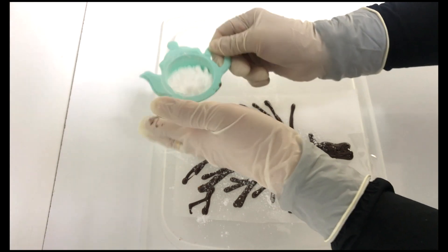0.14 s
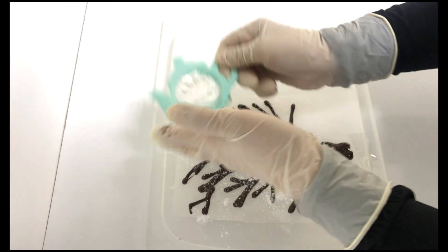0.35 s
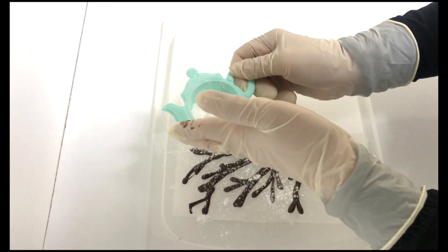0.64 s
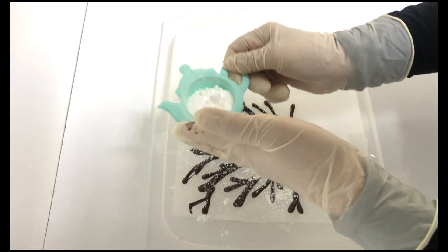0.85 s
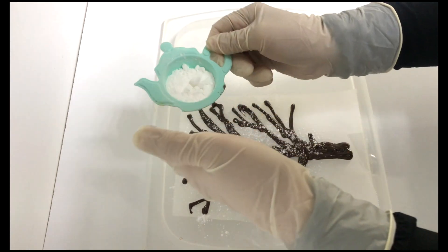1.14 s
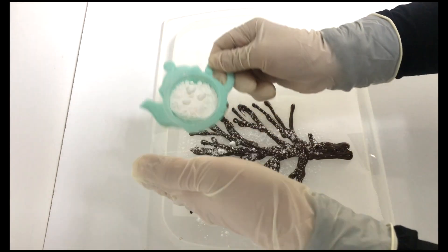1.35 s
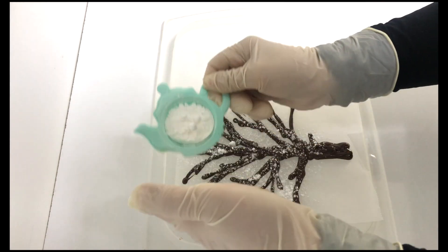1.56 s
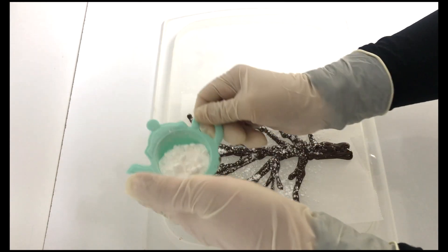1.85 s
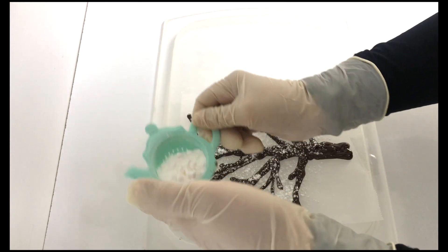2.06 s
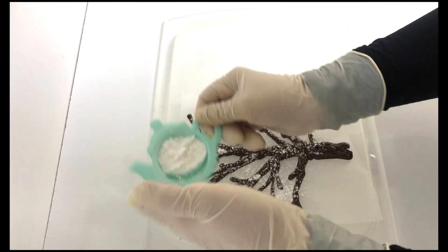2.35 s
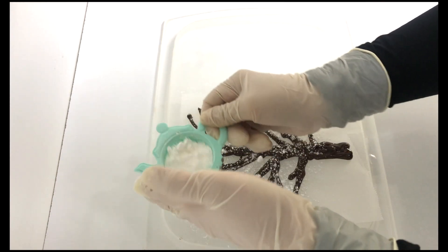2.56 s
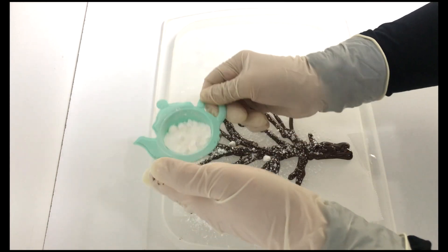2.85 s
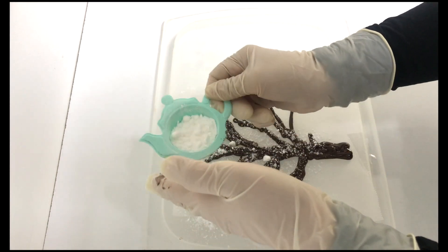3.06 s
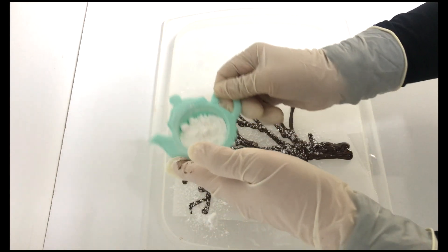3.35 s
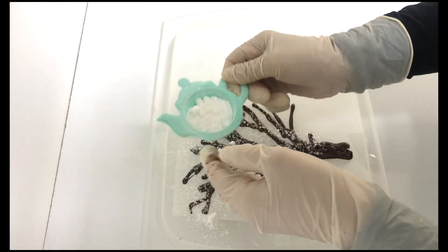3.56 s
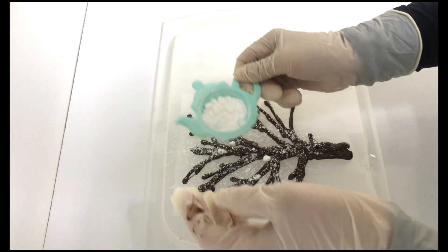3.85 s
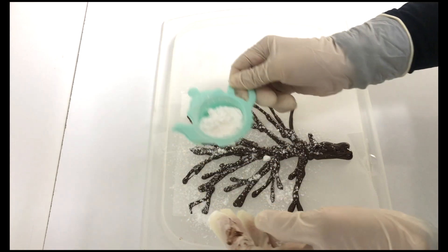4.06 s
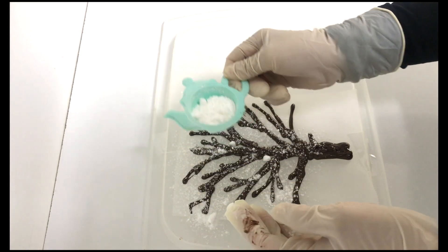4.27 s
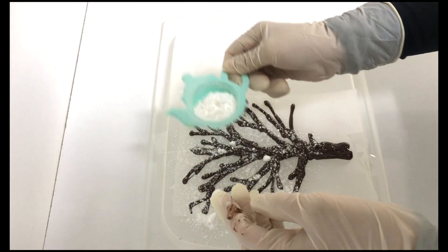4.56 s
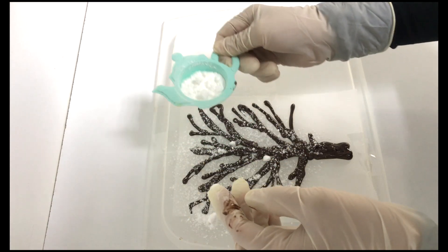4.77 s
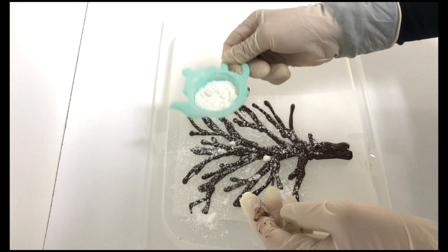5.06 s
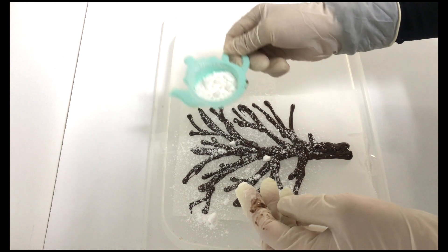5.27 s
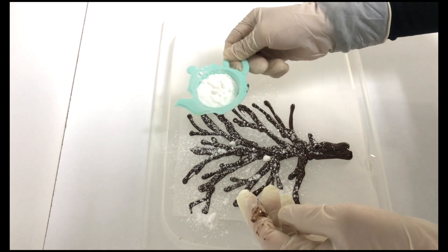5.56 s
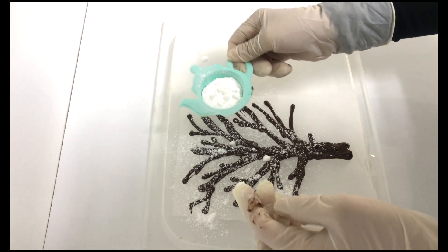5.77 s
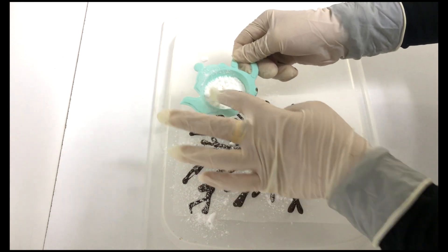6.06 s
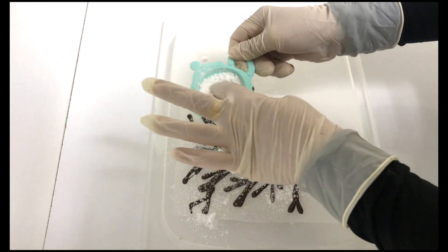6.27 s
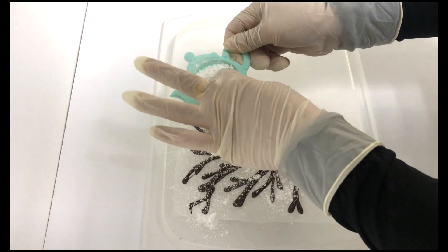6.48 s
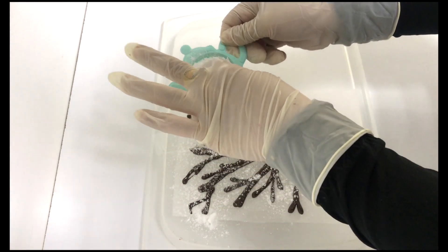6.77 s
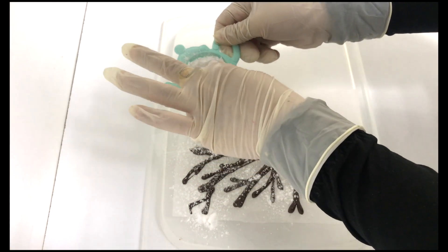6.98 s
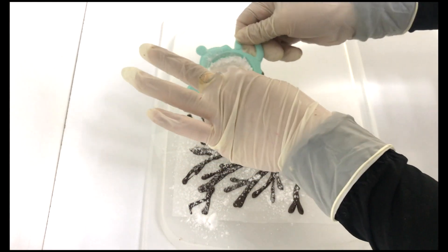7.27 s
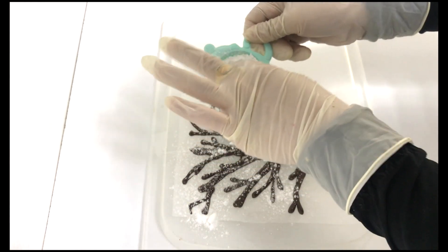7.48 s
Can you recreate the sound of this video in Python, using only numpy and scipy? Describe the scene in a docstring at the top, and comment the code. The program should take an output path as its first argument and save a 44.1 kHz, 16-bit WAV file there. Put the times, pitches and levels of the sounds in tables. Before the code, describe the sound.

A plastic sieve of powdered sugar is tapped and shaken, with quick grainy hisses, light ticks and two hollow knocks.

```python
"""Sifting powdered sugar

A small plastic sieve is tapped against a gloved hand and shaken over a plastic tub. Each stroke slides
sugar over the mesh in a grainy hiss while lumps tick on the wall, both coloured by the sieve's cup.
The tub takes two hollow knocks, and the rubber glove rubs the rim, mostly near the end.
Underneath, an appliance hums in the small kitchen."""
import sys
import numpy as np
from scipy import signal
from scipy.fft import rfft, irfft
from scipy.io import wavfile

SR = 44100
rng = np.random.default_rng(int(sys.argv[2]) if len(sys.argv) > 2 else 0)


def wav_out(sig):
    """Save sig, one row per channel (or a flat mono array), as 16-bit PCM at SR to the path in sys.argv[1]."""
    wavfile.write(sys.argv[1], SR, np.round(np.clip(np.atleast_2d(sig).T, -1, 1) * 32767).astype(np.int16))


N = 336483
TIME = np.arange(N) / SR

# The appliance's rush of air. Each row: frequency in Hz, relative level in dB.
AIR_COLOUR = [(15, -60), (25, -18.5), (53, -8.5), (175, 1), (463, -6.5), (531, -4.5), (863, -14.5),
              (1650, -20), (2110, -19.5), (3080, -18.5), (4250, -23), (5140, -22), (7510, -26.5),
              (11600, -33), (16000, -37)]
# Its motor tones. Each row: frequency in Hz, rms level in dB, depth of waver in dB.
MOTOR_TONES = [(80.8, -69.5, 3), (122.5, -75, 3.5), (157.8, -63, 1.5), (199.5, -61.5, 4.5), (243, -65, 2),
               (322.7, -69, 5.5), (520.3, -63, 0.5)]
# The kitchen's reverb. Each row: frequency in Hz, seconds to fall 60 dB.
ROOM_DECAY = [(150, 0.78), (600, 0.56), (2000, 0.39), (5000, 0.19), (14000, 0.15)]
# A faint swell, then the glove on the rim. Each row: crest in seconds, level in dB, half length in seconds, #
# squeak in Hz. The first row, near 4.1 s, is a faint hoarse swell; the rest are the glove rubbing the rim.
RUBS_AND_SWELL = [(4.102, -59, 0.36, 2500), (6.301, -54.5, 0.23, 3900), (6.62, -59.5, 0.1, 4900),
                  (6.961, -55, 0.092, 5400), (7.198, -61, 0.05, 4200), (7.62, -60, .06, 4800)]
# The tone of slipping rubber. Each row: frequency in Hz, relative level in dB.
RUBBER_COLOUR = [(800, -36), (1600, -2), (2900, -1), (3550, -1), (3850, 1.5), (4250, 2), (4800, -1.5),
                 (5600, -4), (6600, -5), (8000, -14), (11000, -19), (16000, -25)]
# Blows and skids that make up the two knocks. Each row: start in seconds, level in dB,
# high cut in Hz, low cut in Hz, contact time in seconds, ring in the blend in dB.
TUB_BLOWS = [(2.4951, -22, 1970, 790, 0.002, -5), (2.4972, -13, 1270, 363, 0.01, -3.5),
             (2.5592, -23, 1920, 320, 0.035, 0), (2.592, -36, 1400, 480, 0.02, -2),
             (5.597, -36.5, 900, 400, 0.013, -16), (5.607, -23, 1390, 403, 0.034, -3.5),
             (5.634, -27, 1520, 200, 0.01, -8), (5.647, -26, 1850, 141, .017, -17),
             (5.673, -30.5, 480, 220, 0.011, -17), (5.741, -40, 420, 201, 0.0036, -24),
             (5.813, -39.5, 850, 160, 0.031, -25)]
# The tub's hollow ring. Each row: frequency in Hz, relative level in dB, seconds to fall 60 dB.
TUB_MODES = [(172, -17, .2), (326, -6, .25), (341.5, -8, .25), (370, -15, .18), (510, -11, .24),
             (545, -11, .22), (574.5, 2, .33), (591, -7, .3), (607, -8, .28), (640, -8, .32),
             (761, -10, .28), (894, -7, .2), (1088, -11, .15), (1255, -7, .16), (1458, -3, .19),
             (1617, -9, .16), (1741, -9, .16), (2066, -10, .15), (2440, -8, .12), (2590, -12, .1),
             (3180, -14, .1), (4170, -18, .08)]
# The tub's attack. Each row: frequency in Hz, relative level in dB.
CRACK_COLOUR = [(100, 5.5), (170, 1.5), (250, -3.5), (340, 3.5), (560, 0.5), (850, -2), (1050, -7),
                (1450, -1), (2100, -4), (3200, -0.5), (4600, -2.5), (5600, -1), (10000, 4)]
# The held sieve's ring. Each row: frequency in Hz, relative level in dB, seconds to fall 60 dB.
SIEVE_MODES = [(894, 0.5, 0.066), (1468, -8, 0.12), (1660, -2.5, 0.044), (2330, -6, 0.036),
               (2830, -3, 0.073)]
# Broad resonances of the sieve's cup. Each row: centre in Hz, width in Hz, lift in dB.
CUP_RESONANCES = [(4357, 150, 5), (5300, 540, -1), (6030, 170, 3), (7150, 120, 6), (8620, 920, 5.5),
                  (11060, 490, 4.5), (13050, 1200, 2.5)]
# The hand shades the cup and lowers its lowest resonance. Each row: time in seconds, low edge in Hz.
GRIP_EDGE = [(0.2, 3400), (0.8, 3820), (1.35, 4140), (1.7, 3500), (3.05, 3240), (3.9, 4030), (5.45, 3850),
             (5.65, 3280), (6.6, 3220), (7.0, 2720), (7.6, 3630)]
# The rim meets the hand and the sugar runs on. Each row: start in seconds, sugar level in dB,
# gain of the sieve's ring and slap in dB.
HAND_TAPS = [(0.111, -36, -52.5), (.296, -35, -56), (0.491, -37, -55), (.696, -33.5, -61),
             (.883, -37.5, -53), (1.307, -37.5, -57), (1.527, -36.5, -56), (1.732, -39.5, -54),
             (1.905, -38, -54), (2.097, -37.5, -48), (2.298, -35.5, -46.5), (2.883, -46, -58),
             (3.035, -38, -56.5), (3.237, -42.5, -57)]
# Big lumps and fingers on the plastic. Each row: start in seconds, level in dB, brightness in dB.
WALL_TICKS = [(.1116, -31, -16), (.456, -34.5, -37), (.6505, -36, -2), (.682, -27.5, 4), (.8371, -39, 12),
              (.864, -26, -21), (1.0285, -37, 26), (1.093, -44, 19), (1.5061, -38.5, -38),
              (1.645, -29, -13), (1.9798, -32, 4), (2.045, -27.5, -7), (2.1858, -40, -18),
              (2.2502, -29.5, 7), (2.2851, -24.5, -16), (2.4462, -34, 6), (2.489, -28, -18),
              (2.6637, -32.5, -9), (2.7714, -44.5, -14), (2.9615, -36.5, 17), (2.9984, -34, -34),
              (3.1944, -27.5, 3), (3.24, -34, -2), (3.3419, -30.5, 4), (3.3984, -41, -20),
              (3.4993, -24.5, -36), (3.726, -41, 24), (4.0146, -33, 8), (4.154, -23, -14),
              (4.478, -29.5, -3), (4.5504, -34, -24), (4.809, -35, -35), (4.885, -31.5, -19),
              (5.169, -37, 21), (5.425, -26, 8), (5.616, -31, -13), (5.6477, -18, -18), (5.7121, -28.5, -5),
              (5.764, -23.5, 7), (5.8708, -35.5, -7), (5.9433, -35, 21), (6.4708, -36.5, -40),
              (6.9926, -18.5, -30), (7.096, -37, 18), (7.1652, -36, -28)]
# Swings throw the sugar back. Each row: crest in seconds, level in dB, half length in seconds,
# brightness in dB.
BACK_SWINGS = [(.064, -55.5, 0.02, -2), (.257, -46, 0.013, 7), (0.443, -47, 0.0093, -8),
               (0.658, -44, 0.012, 6), (0.857, -48, 0.019, -8), (0.968, -55, .009, -17),
               (1.449, -50, 0.019, 13), (1.648, -45.5, 0.016, 0), (1.849, -43, 0.016, -9),
               (1.984, -46, 0.0071, 11), (2.048, -45, 0.02, 4), (2.264, -42.5, 0.03, 1),
               (2.307, -38, 0.027, 1), (2.46, -54, 0.045, 1), (2.515, -46, 0.023, 11),
               (2.62, -42, 0.0085, 0), (2.682, -48, 0.028, -5), (2.936, -48, 0.0094, -1),
               (3.001, -51.5, 0.027, 0), (3.193, -46, 0.032, 4), (3.311, -50, .012, -17),
               (3.38, -40, 0.036, -9.5), (3.474, -52, 0.009, -13), (3.516, -52.5, .013, -13),
               (3.656, -51, 0.022, -36), (5.737, -44, 0.035, -1), (6.256, -49.5, 0.035, 0)]
# Shakes in the air, about twelve a second. Each row: crest in seconds, level in dB.
AIR_SHAKES = [(3.953, -53), (4.025, -62), (4.157, -45.5), (4.224, -43.5), (4.314, -52), (4.403, -44),
              (4.485, -46.5), (4.564, -43), (4.648, -47), (4.732, -45.5), (4.815, -48), (4.892, -53),
              (4.983, -48.5), (5.076, -60), (5.166, -44.5), (5.255, -52.5), (5.345, -47.5), (5.434, -49.5),
              (5.512, -48.5), (5.873, -54.5), (5.953, -49)]
# Strokes muffled under the palm. Each row: crest in seconds, level in dB, rise in seconds.
PALM_STROKES = [(6.35, -47.5, 0.022), (6.48, -37, 0.019), (6.713, -48.5, .019), (6.769, -41, 0.017),
                (7.01, -36.5, 0.023), (7.167, -43, 0.014), (7.473, -43, 0.05), (7.604, -49, .017)]


def undb(db):
    """Decibels to gain."""
    return 10 ** (np.asarray(db) / 20)


def unit(x):
    """Scale to rms 1."""
    return x / np.sqrt(np.mean(x ** 2))


def level_hit(x, db, span_s):
    """Give a hit the energy of a steady sound at db lasting span_s."""
    return undb(db) * x / np.sqrt(np.sum(x ** 2) / (span_s * SR))


def add(out, start_s, x):
    """Mix x into out at start_s."""
    offset = int(round(start_s * SR))
    first, end = max(offset, 0), min(offset + len(x), N)
    out[first:end] += x[first - offset:end - offset]


def freqs(size):
    """Bin frequencies in Hz for size samples, floored at 1."""
    return np.maximum(np.arange(size // 2 + 1) * SR / size, 1)


def over_hz(points, hz):
    """Read (Hz, value) points on a log-frequency axis."""
    point_hz, value = np.transpose(points)
    return np.interp(np.log(hz), np.log(point_hz), value)


def tint(x, points):
    """EQ x through (Hz, dB) points, then scale to rms 1."""
    return unit(irfft(rfft(x) * undb(over_hz(points, freqs(len(x)))), len(x)))


def butter(x, hz, kind, order=2):
    """Low-pass or high-pass filter."""
    return signal.sosfilt(signal.butter(order, min(hz, SR / 2 - 1), kind, fs=SR, output="sos"), x)


def walk(rate_hz):
    """Smooth random wander with a spread near 1."""
    knots = rng.standard_normal(int(N / SR * rate_hz) + 2)
    return np.interp(TIME * rate_hz, np.arange(len(knots)), knots)


def grains(n, per_s, spread_db):
    """A dense spray of tiny, uneven impacts."""
    hits = rng.random(n) < per_s / SR
    return hits * rng.standard_normal(n) * undb(spread_db * np.minimum(rng.exponential(size=n), 4))


def ring(modes, t):
    """Modes struck together, balanced a little differently at each point of contact."""
    hz, db, t60 = np.transpose(modes)[:, :, None]
    gains = undb(db + 2.05 * rng.standard_normal((len(modes), 1)))
    return np.sum(gains * np.sin(2 * np.pi * hz * t) * np.exp(-np.log(1000) * t / t60), axis=0)


def appliance(air_db=-55, drift_hz=1.655):
    """The bed: wavering motor tones over a steady rush of air."""
    out = tint(rng.standard_normal(N), AIR_COLOUR) * undb(air_db + .5 * walk(2.45))
    for hz, db, waver_db in MOTOR_TONES:
        phase = 2 * np.pi * np.cumsum(hz + drift_hz * walk(12)) / SR
        out += np.sqrt(2) * undb(db + waver_db * walk(5.4)) * np.sin(phase)
    return out


def kitchen(x, wet_db, predelay_s):
    """Hard walls add a diffuse tail whose treble dies first."""
    hz, t, spectrum = signal.stft(rng.standard_normal(SR // 2), SR)
    fade = np.exp(-np.log(1000) * t / over_hz(ROOM_DECAY, hz + 1)[:, None])
    tail = signal.istft(spectrum * fade, SR)[1]
    tail = np.pad(tail / np.sqrt(np.sum(tail ** 2)), (int(predelay_s * SR), 0))
    return x + undb(wet_db) * signal.fftconvolve(x, tail)[:len(x)]


def glove_and_swell(squeak_db=-3, hoarse_hz=250, wander_hz=250):
    """Rubber drags on plastic in tiny slips and squeaks hoarsely as it presses harder; the same slips and
    squeak also shape a faint hoarse swell near 4.1 s."""
    pressure = sum(undb(db) * np.exp(-((TIME - s) / half_s) ** 2) for s, db, half_s, _ in RUBS_AND_SWELL)
    slips = tint(grains(N, per_s=6000, spread_db=2), RUBBER_COLOUR)
    crests, _, _, squeak_hz = np.transpose(RUBS_AND_SWELL)
    pitch_hz = np.interp(TIME, crests, squeak_hz) + wander_hz * walk(25)
    rasp = butter(rng.standard_normal(N), hoarse_hz, "low")
    squeak = unit(rasp * np.sin(2 * np.pi * np.cumsum(pitch_hz) / SR))
    squeak_gain = undb(squeak_db + 2 * walk(21)) * pressure / np.max(pressure)
    return unit(slips + squeak_gain * squeak) * pressure * undb(1.9 * walk(35))


def tub():
    """Each blow is a crack of crowded modes that fills the room, then the ring of the thin walls."""
    out = np.zeros(N)
    t = np.arange(SR // 2) / SR
    for start_s, db, high_cut_hz, low_cut_hz, contact_s, ring_db in TUB_BLOWS:
        crack = unit(tint(rng.standard_normal(len(t)), CRACK_COLOUR) * np.exp(-t / contact_s))
        blow = kitchen(crack, wet_db=-13.5, predelay_s=.006) + undb(ring_db) * ring(TUB_MODES, t)
        blow = butter(blow, high_cut_hz, "low")  # softer contact, duller blow
        blow = butter(blow, low_cut_hz, "high")
        add(out, start_s, level_hit(blow, db, span_s=0.011))
    return butter(out, 105, "high", order=3)


def hand_taps(slap_db=1, slap_s=0.012, attack_s=0.001):
    """The soft hand wakes the sieve's low modes, with a small slap of rubber."""
    out = np.zeros(N)
    t = np.arange(SR // 5) / SR
    attack = 1 - np.exp(-t / attack_s)
    slap_colour = [(500, -20), (1400, -13), (2800, -3.0), (6000, -16.5)]  # Hz, dB
    for start_s, _, db in HAND_TAPS:
        slap = tint(rng.standard_normal(len(t)), slap_colour) * np.exp(-t / slap_s)
        add(out, start_s, undb(db) * (ring(SIEVE_MODES, t) + undb(slap_db) * slap) * attack)
    return out


def edge_at(time_s):
    """The cup's low edge in Hz for the grip at this moment."""
    return np.interp(time_s, *np.transpose(GRIP_EDGE))


def treble(bright_db):
    """Turn one brightness into the cup's EQ gains in dB at 7.8 and 12.5 kHz."""
    return -0.5 + 0.52 * bright_db, bright_db


def cup(x, edge_hz, mid_db, top_db, ring_width_hz=300, echo_gain=.3):
    """The sieve's cup rings at its lowest resonance, near edge_hz, and radiates little below it."""
    hz = freqs(len(x))
    tilt_db = over_hz([(4700, 0.0084), (7800, mid_db), (12500, top_db), (16000, top_db - 6.5)], hz)
    peaks_db = sum(db / (1 + (2 * (hz - centre) / width) ** 2) for centre, width, db in CUP_RESONANCES)
    lowest_mode = 1 + 0.25 / (1 + 2j * (hz - 1.004 * edge_hz) / ring_width_hz)
    # Close echoes off the hand and cup wall comb every stroke differently.
    lags_s = rng.uniform(.0003, .0015, size=(3, 1))
    comb = np.prod(1 / (1 + echo_gain * np.exp(-2j * np.pi * hz * lags_s)), axis=0)
    coloured = irfft(rfft(x) * undb(tilt_db + peaks_db) * lowest_mode * comb, len(x))
    return butter(coloured, edge_hz, "high", order=9)


def stray_lumps(scatter_s=0.013, above_sugar_db=3, bright_db=-2, bright_spread_db=9):
    """Tick cues for one stray lump hitting the wall in each swing or shake."""
    moves = list(BACK_SWINGS) + list(AIR_SHAKES)
    chance = np.clip(rng.standard_normal((len(moves), 3)), -2, 2)
    return [(s + scatter_s * lag, db + above_sugar_db + size_db, bright_db + bright_spread_db * hardness)
            for (s, db, *_), (lag, size_db, hardness) in zip(moves, chance)]


def wall_ticks(decay_s=.0018, edge_ratio=1.086):
    """Lumps and fingers ring the damped plastic briefly; hard contact pitches the cup a little up."""
    out = np.zeros(N)
    t = np.arange(SR // 40) / SR
    for start_s, db, bright_db in list(WALL_TICKS) + stray_lumps():
        burst = rng.standard_normal(len(t)) * np.exp(-t / decay_s)
        burst = np.pad(burst, (len(t), 0))  # room for the EQ's pre-ring
        tick = cup(burst, edge_ratio * edge_at(start_s), *treble(bright_db))
        add(out, start_s - len(t) / SR, level_hit(tick, db, span_s=0.0013))
    return out


def small_lumps(n, per_s=700, ring_s=.0018, spread_db=3.8):
    """Each small lump lands on its own spot and pings at its own pitch."""
    out = np.zeros(n)
    t = np.arange(SR // 100) / SR
    count = int(per_s * n / SR)
    starts = rng.integers(0, n - len(t), size=(count, 1))
    hz = rng.uniform(2500, 16000, size=(count, 1))
    gains = undb(spread_db * np.clip(rng.standard_normal((count, 1)), -2, 2))
    pings = gains * np.sin(2 * np.pi * hz * t) * np.exp(-t / ring_s)
    np.add.at(out, starts + np.arange(len(t)), pings)
    return unit(out)


def strokes(tap_rise_s=0.0041, tap_fall_s=0.015, shake_s=0.018, palm_fall_s=0.029):
    """Cues for every throw of powder: crest, level, rise, fall and the two treble gains."""
    taps = [(s + tap_rise_s, db, tap_rise_s, tap_fall_s, (-3.5, -12.5)) for s, db, _ in HAND_TAPS]
    swings = [(s, db, half_s, half_s, treble(bright_db)) for s, db, half_s, bright_db in BACK_SWINGS]
    shakes = [(s, db, shake_s, shake_s, treble(bright_db=1)) for s, db in AIR_SHAKES]
    muffled = [(s, db, rise_s, palm_fall_s, treble(bright_db=-21.5)) for s, db, rise_s in PALM_STROKES]
    return taps + swings + shakes + muffled


def sugar():
    """Each stroke throws powder over the mesh: a swell of fine grains and small lumps."""
    out = np.zeros(N)
    t = np.arange(-SR // 8, SR // 5) / SR  # zero is the crest
    for crest_s, db, rise_s, fall_s, treble_db in strokes():
        swell = np.where(t < 0, np.exp(-np.abs(t / rise_s) ** 2.64), np.exp(-np.abs(t / fall_s) ** 1.6))
        impacts = unit(grains(len(t), per_s=8000, spread_db=1.8)) + small_lumps(len(t))
        hiss = unit(cup(impacts, edge_at(crest_s), *treble_db))
        add(out, crest_s + t[0], undb(db) * swell * hiss)
    return out


def scene():
    """A mono mix: sieve and tub up front, the appliance low behind them."""
    sieve = kitchen(sugar() + wall_ticks() + hand_taps() + glove_and_swell(), wet_db=-11.0, predelay_s=0.0035)
    return (sieve + tub() + appliance())[None]


def record(dry, low_cut_hz=40, high_cut_hz=15700):
    """Master EQ: trim the deepest rumble and the very top."""
    steep_low_pass = signal.ellip(10, .2, 70, high_cut_hz, fs=SR, output="sos")
    return signal.sosfilt(steep_low_pass, butter(dry, low_cut_hz, "high", order=4))


dry = scene()
out = record(dry)
wav_out(out)
```